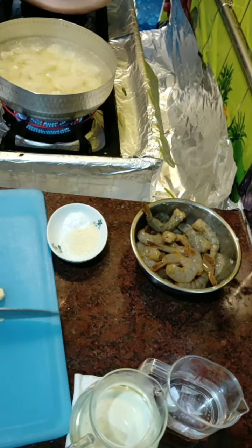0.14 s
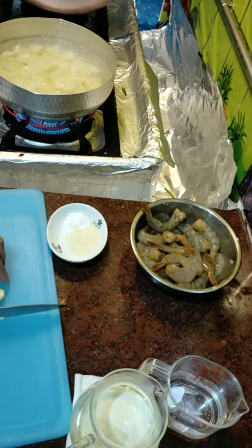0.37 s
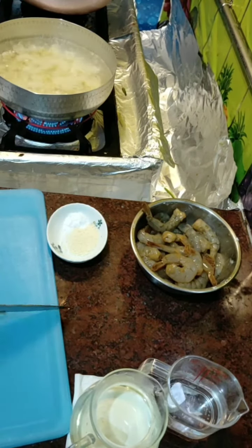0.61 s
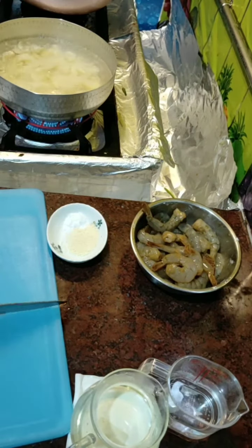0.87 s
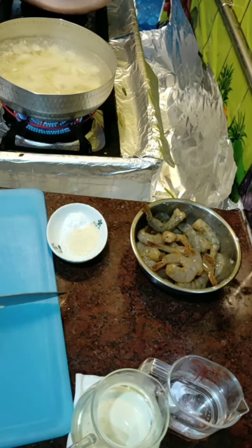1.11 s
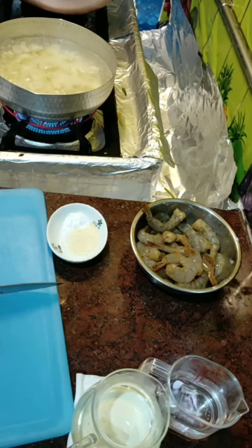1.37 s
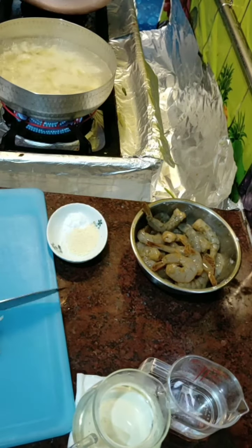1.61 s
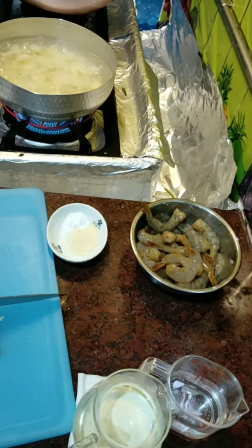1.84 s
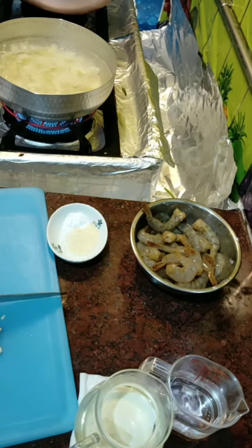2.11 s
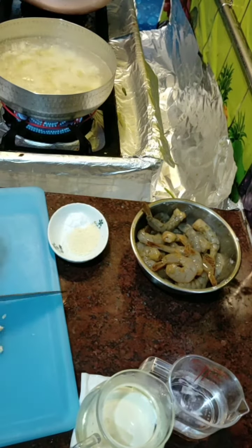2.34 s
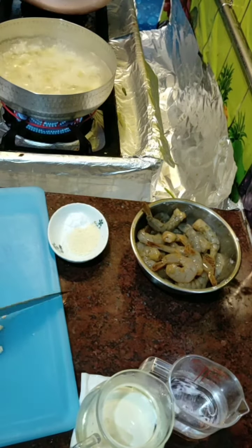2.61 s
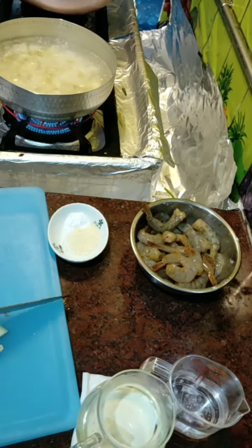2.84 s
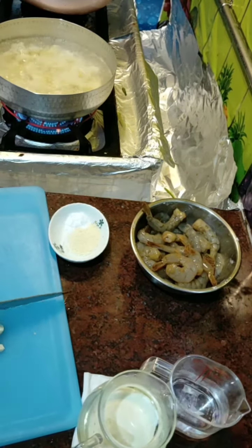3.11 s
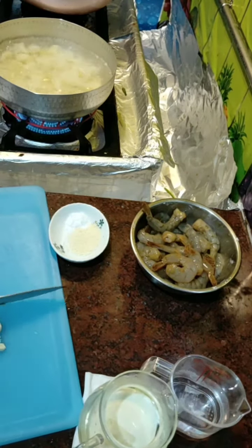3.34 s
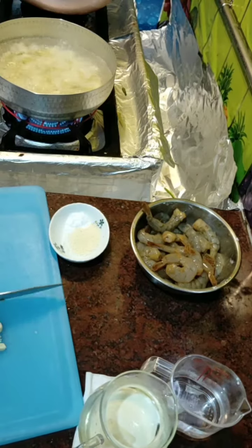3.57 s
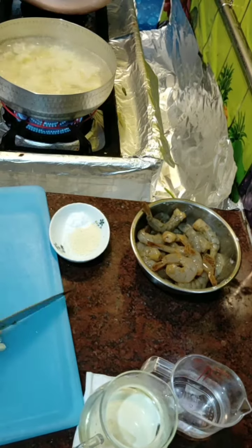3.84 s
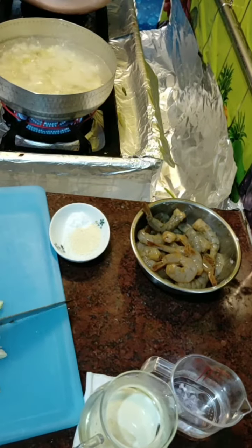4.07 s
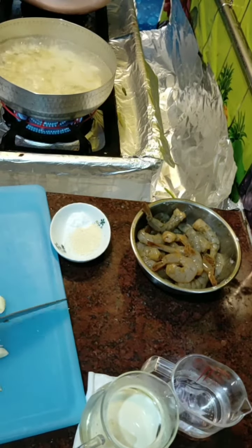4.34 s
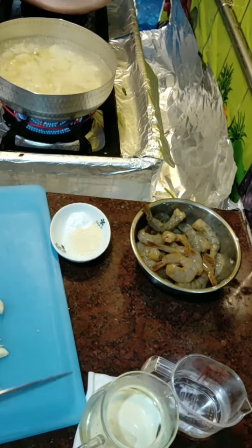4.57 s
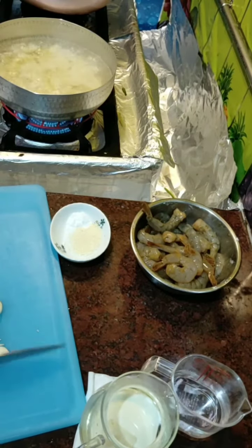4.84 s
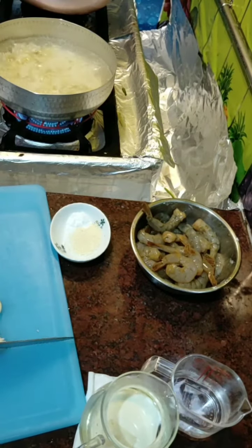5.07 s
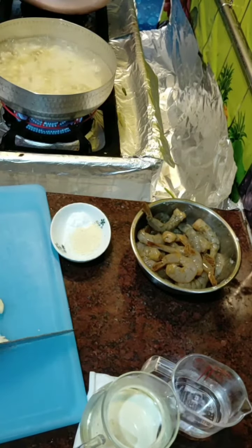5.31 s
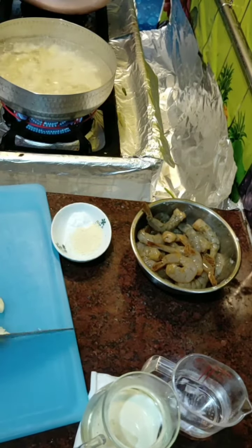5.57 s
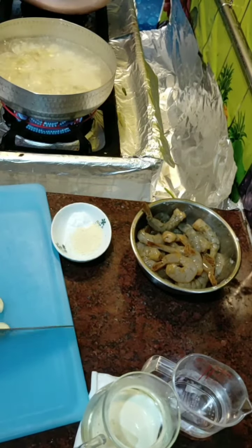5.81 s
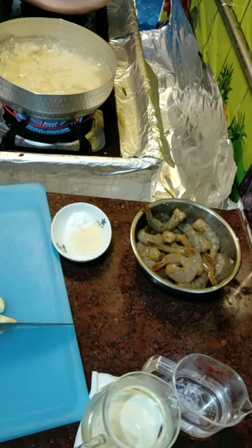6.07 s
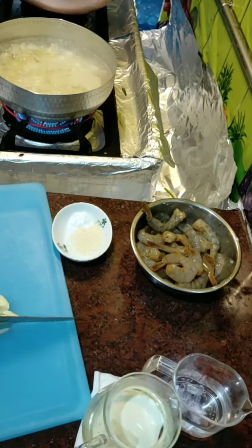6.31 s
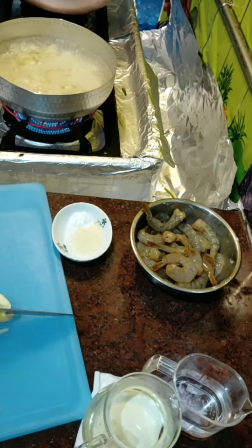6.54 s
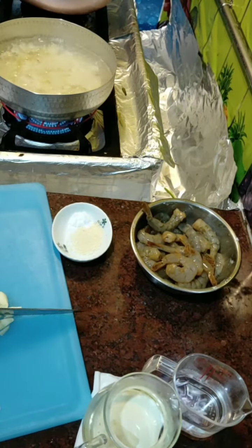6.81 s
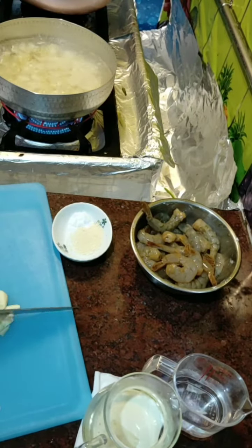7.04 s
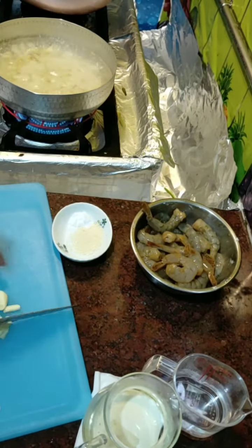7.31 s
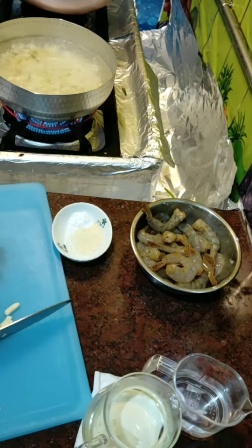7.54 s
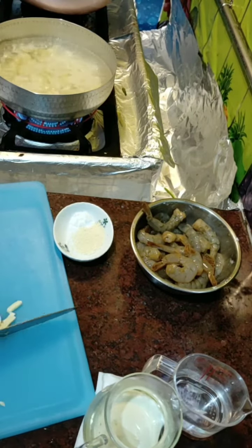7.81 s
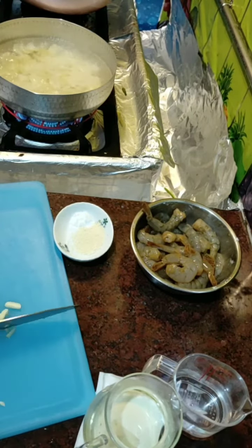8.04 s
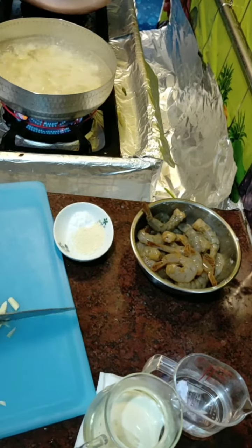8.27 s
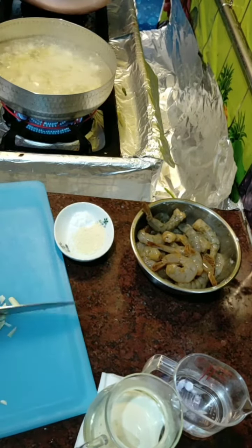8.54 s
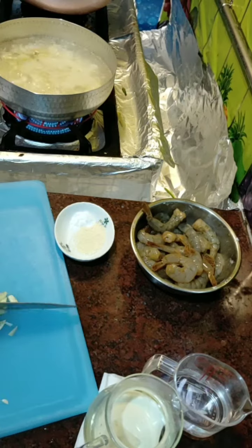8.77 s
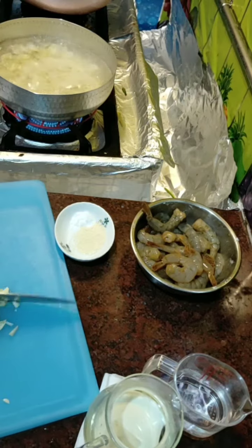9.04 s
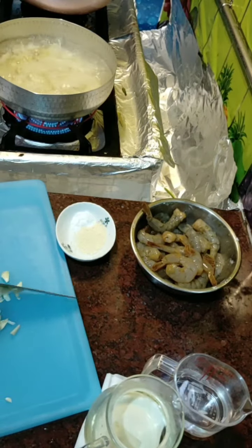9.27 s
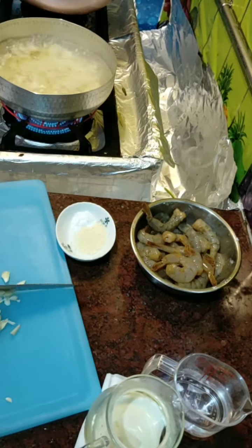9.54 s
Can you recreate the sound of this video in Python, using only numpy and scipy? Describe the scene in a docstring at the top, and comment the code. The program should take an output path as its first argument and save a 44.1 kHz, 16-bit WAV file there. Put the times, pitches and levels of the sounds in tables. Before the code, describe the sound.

Crisp garlic crunches and dry plastic-board knocks in a hard small kitchen, with brief blade rings, two short scrapes and soft bubbling far underneath.

```python
"""A crunch of garlic under a kitchen knife, then about four strokes a second on a plastic board in a hard kitchen.
Cells burst as random clicks, the edge's rub and blows excite damped board modes, and a counter thuds below.
Some blows set the steel blade or a dish ringing as dying sines; twice the edge sticks and slips sideways.
A simmering pot (bubbles as rising sines), shaped stove noise and wavering hum lie under it.
A phone's two microphones hear it, with sparse decaying echoes, a noise suppressor and soft overload."""
import sys
import numpy as np
from scipy import signal
from scipy.fft import rfft, irfft, next_fast_len
from scipy.io import wavfile
from scipy.ndimage import uniform_filter1d

SR = 44100
rng = np.random.default_rng(int(sys.argv[2]) if len(sys.argv) > 2 else 0)


def elevation(decibels):
    """Turn decibel levels (scalar or array-like) into linear amplitude ratios."""
    levels = np.asarray(decibels, float)
    return 10 ** (levels / 20)


def int16_out(signal):
    """Quantize to a 16-bit WAV file."""
    q = np.round(np.clip(np.atleast_2d(signal).T, -1, 1) * 32767)
    wavfile.write(sys.argv[1], SR, q.astype(np.int16))


N = 425565

# passes of the edge through the clove, or nudges of the slices: (bite [s], bearing down lasts [s],
# holding lasts [s], crunch level [dB], level of the rub passed into the board [dB])
CUT_PASSES = [(0.0, 0.0018, 0.0017, -48.5, -43.5), (0.14, 0.06, 0.011, -44.5, -40.5),
              (0.246, 0.039, 0.15, -61.5, -53), (0.57, 0.009, 0.021, -77.5, -69),
              (0.702, 0.018, 0.015, -77.5, -55.5), (0.729, 0.051, 0.013, -46, -41.5),
              (1.005, 0.048, 0.023, -40, -50.5), (1.294, 0.034, 0.019, -33, -23.5),
              (1.58, 0.0099, 0.0049, -26, -41), (1.869, 0.075, 0.011, -44, -38.5),
              (2.171, 0.048, 0.028, -38.5, -38.5), (2.401, 0.0095, 0.1, -66.5, -58.5),
              (2.471, 0.023, 0.017, -63.5, -59), (2.665, 0.037, 0.027, -54.5, -56.5),
              (2.819, 0.013, 0.011, -83, -55), (2.959, 0.018, .01, -75.5, -59.5),
              (3.004, 0.059, 0.0072, -45, -40.5), (3.282, 0.038, 0.017, -50.5, -46),
              (3.527, 0.043, 0.043, -46, -49.5), (3.764, 0.036, 0.014, -45, -64.5),
              (3.895, 0.03, 0.035, -51, -54.5), (4.102, 0.032, 0.057, -82, -60),
              (4.154, 0.0466, 0.033, -51, -40.5), (4.444, 0.02, 0.028, -87, -74),
              (4.715, 0.12, 0.095, -45, -42.5), (5.16, 0.038, 0.042, -48, -42.5),
              (5.399, 0.024, 0.06, -46.5, -49.5), (5.628, 0.016, 0.086, -46.5, -46.5),
              (5.883, 0.02, 0.019, -45, -47.5), (5.985, 0.023, 0.011, -85, -60),
              (6.124, 0.054, 0.0084, -47, -39), (6.377, 0.041, 0.0066, -53, -42.5),
              (6.526, 0.022, 0.15, -96, -63), (6.637, 0.024, 0.015, -41, -41),
              (6.776, 0.018, 0.015, -104, -60.5), (6.89, 0.044, 0.0135, -48, -40.5),
              (7.139, 0.049, 0.012, -51.5, -46), (7.359, 0.042, 0.082, -87, -61),
              (7.504, 0.047, 0.009, -55, -49.5), (7.731, 0.058, 0.0097, -56.5, -43),
              (8.015, 0.034, 0.04, -53, -47.5), (8.189, 0.016, 0.017, -93, -68.5),
              (8.274, 0.032, 0.049, -49.5, -44.5), (8.518, 0.043, 0.023, -45, -40.5),
              (8.778, 0.047, 0.039, -54.5, -47.5), (9.009, 0.052, 0.098, -49, -47),
              (9.331, 0.059, 0.026, -59, -50), (9.587, 0.06, .02, -50.5, -45)]
# landings of the edge: (time [s], blow level [dB], upper board modes [dB rel],
# lower board modes [dB rel], counter thud [dB rel])
EDGE_LANDINGS = [(0.165, -39.5, -6, -9, -20), (0.209, -26.5, 0, -3, -11), (0.483, -49, -4.5, -34, -20),
                 (0.758, -41.5, 1, -5, -43), (0.807, -25, -4.5, -4.5, -24.5), (1.028, -42, -8, -7, -34.5),
                 (1.049, -29.5, -7.5, -11.5, -57.5), (1.115, -38.5, -11.5, 2, -49),
                 (1.3203, -8, -0.5, -18.5, -60), (1.6038, -5, 0, -13, -21), (1.903, -39, -2.5, -37, -42),
                 (1.945, -37, -2, -13.5, -34), (1.955, -39, -3, 4, -42.5), (1.975, -38, -20, 3, -7.5),
                 (1.998, -48.5, -12, 4.5, -36), (2.201, -36, -3.5, -15, -47.5),
                 (2.213, -29.5, 2.5, -2.5, -43), (2.261, -37, -4, -1.5, -36.5),
                 (2.275, -31.5, -3, -12, -34), (2.285, -37.5, -1, -11, -39.5),
                 (2.699, -43, -1.5, -30, -10.5), (2.72, -41, -6, -22, -34), (2.805, -54, -2, -27.5, -37.5),
                 (2.905, -53, 1, -19.5, -15), (3.049, -41.5, -9.5, -25, -33), (3.077, -22, 0.5, -5.5, -5.5),
                 (3.088, -29.5, 0, -10, -32), (3.094, -35, -2, -8, -37), (3.101, -36, -11.5, -20, -34),
                 (3.318, -41, -14, -20.5, 6), (3.355, -25.5, -4.5, -4, -12), (3.378, -30.5, -3, -9, -30),
                 (3.557, -37, -5.5, -18, -7), (3.614, -35, -5, -5.5, -30.5), (3.937, -37.5, -9.5, -25, -29),
                 (3.98, -40, -10, -10, -38), (4.004, -38, -9, -6, -11), (4.107, -46.5, -7.5, -30, -39),
                 (4.197, -39.5, 2, -7.5, -21), (4.237, -30, -12, -5.5, -3),
                 (4.681, -18.5, -10.5, -10, -55.5), (4.692, -30.5, -10.5, -10, -57),
                 (4.797, -35.5, -20, -24, -45.5), (4.818, -28.5, -7, -29, -48), (4.84, -29, -17, -21, -48),
                 (4.874, -24, -20, -5.5, -43), (4.896, -21.5, -34, -7, -17), (4.921, -29.5, -10, -7.5, -17),
                 (5.181, -33, -16, -14, -58.5), (5.265, -34.5, -9, -2.5, -16), (5.428, -40, -19, -15, -42),
                 (5.438, -29, -10, -20, -42), (5.502, -31, -3.5, -10.5, -49), (5.657, -44, -9, -7, -28),
                 (5.682, -38.5, -9, -18, -4), (5.912, -39.5, -8.5, -23, -31), (5.938, -45, -5.5, 2, -42),
                 (6.079, -54.5, -38, -6.5, -5.5), (6.186, -40.5, -5.5, -4.5, -39),
                 (6.19, -27, -11.5, -6.5, -8.5), (6.206, -28.5, -12, -4, -32), (6.216, -25.5, 1, -21, -44),
                 (6.431, -35, -6.5, -0.5, -5.5), (6.447, -46, -27, 3, -40.5),
                 (6.622, -49.5, -23.5, -4, -39), (6.663, -33.5, -5.5, -28, -46),
                 (6.921, -43.5, -6.5, -18, -59), (6.956, -39.5, -6.5, 0, -29),
                 (7.177, -37.5, -10.5, -33, -8.5), (7.556, -36.5, -11, -30, -52),
                 (7.646, -46.5, -13, -55, -34), (7.787, -23, -9, -14, -30), (7.801, -30, -4.5, -3.5, -39),
                 (7.821, -30, 0.5, -5.5, -8), (8.042, -43.5, -3.5, -31.5, -41), (8.124, -39, -6, -2.5, -41),
                 (8.351, -41.5, -5, -0.5, -35.5), (8.377, -36.5, -4, -2.5, -38),
                 (8.562, -31, -6.5, 1.5, -11), (8.624, -27.5, 0, -9.5, -16),
                 (8.739, -44.5, -13, -27, -41.5), (8.792, -45, -3.5, -47, -41), (8.851, -37, 1.5, 2.5, -12),
                 (8.879, -33, -9, -25, -31), (9.046, -31, -4, -8.5, -42), (9.099, -33, -12, 0.5, -30),
                 (9.137, -21, -2.5, -17.5, -42.5), (9.282, -48, -21, -24, 1), (9.354, -43, -11, -32, -55),
                 (9.39, -39.5, -5, -10, -12.5), (9.631, -40.5, -1, -23, -35.5)]
# coherence of the two ports: (frequency [Hz], left-right likeness [-1 to 1])
PORT_LIKENESS = [(60, -1.2), (240, 1), (950, 0.14), (3770, 0.13), (15000, 0.35)]


def strokes():
    """Fracture noise: bursting cells are tiny random clicks; the rubbing edge excites the board's modes."""
    # spectrum of the bursts: (frequency [Hz], density [dB per Hz, relative])
    burst_spectrum = [(1650, -13), (2800, -5), (3430, -8.5), (4240, -14.5), (5020, -13.5), (8300, -7.5),
                      (12200, -19.5), (15100, -14.5), (16000, -39)]
    # release: (easing while held [dB/s], first fall [dB/s], lingering fall [dB/s], lingering part [dB])
    crunch_fade = (-110, -600, -150, -7.5)
    # release, same columns: ([dB/s], [dB/s], [dB/s], [dB])
    rub_fade = (-20, -400, -120, -14.5)
    crunch_db, rub_db = np.transpose(CUT_PASSES)[3:]
    crunch = signal.oaconvolve(grains(per_s=8000, spread_db=5.5), colour(burst_spectrum))[:N]
    rub = np.zeros(N)
    for spot in range(3):
        board = struck(upper_db=-5.5, lower_db=-8.5)
        rub += signal.oaconvolve(grains(per_s=600, spread_db=5.0), board)[:N]
    return pressure(crunch_db, crunch_fade) * crunch + pressure(rub_db, rub_fade) * evened(rub)


def pressure(peak_db, fade):
    """Force envelope: each cut bites, bears down, holds and lets go; overlapping cuts add in power."""
    bite_s, bite_db = 0.028, -11  # the edge bites quickly, this far under full strength, then bears down
    bite, bear, hold = np.transpose(CUT_PASSES)[:3, :, None]
    ease_db, fast_db, slow_db, linger_db = fade
    t = np.arange(0, N / SR, .002)
    since = t - bite
    climb = np.clip(since / bite_s, 0, 1) ** 3.4 * elevation(bite_db * np.clip(1 - since / bear, 0, 1))
    held = elevation(ease_db * np.clip(since - bear, 0, hold))
    after = np.maximum(since - bear - hold, 0)
    fall = (elevation(fast_db * after) + elevation(linger_db + slow_db * after)) / (1 + elevation(linger_db))
    envelope = np.linalg.norm(elevation(peak_db)[:, None] * climb * held * fall, axis=0)
    return np.interp(np.arange(N) / SR, t, envelope)


def knocks():
    """Impact: brief contact forces excite a crack, the board's modes and a slower thud of the counter."""
    # first instant of a blow: (frequency [Hz], density [dB per Hz, relative])
    crack_spectrum = [(120, -79), (200, -100), (722, -3), (1080, -27.5), (1320, -25), (1480, 13.5),
                      (1980, 11), (2700, 11.5), (3760, 16), (7830, -3), (11000, -27.5), (16000, -29.5)]
    # counter modes: (frequency [Hz], level [dB rel], T60 [s])
    counter_modes = [(117, 0, 0.2), (100, -3, 0.24), (148, -2, 0.15), (200, -5, .08), (60, -6, 0.15)]
    t, out, crack = np.arange(9000) / SR, np.zeros(N), colour(crack_spectrum)
    for s, db, upper_db, lower_db, thud_db in EDGE_LANDINGS:
        # weak blows are cushioned by the clove and land in several touches
        decay_s = 0.0012 * elevation(-.4 * (db + 13.0))
        touches = rng.standard_normal(1500) ** 3 * np.exp(-t[:1500] / decay_s)
        touches[10] += 24  # the first contact
        touches /= np.linalg.norm(touches)
        board = signal.fftconvolve(touches, struck(upper_db, lower_db))
        add(out, s, elevation(db - 6.5) * board)
        crack_db = 0.96 * db + 8.0 + 0.5 * upper_db
        add(out, s, elevation(crack_db) * signal.fftconvolve(touches, crack))
        swell = (1 - np.exp(-t / .025)) ** 2
        thud = ringing(counter_modes, t, spread_db=2, detune=.02) * swell
        add(out, s, elevation(db + thud_db - 3) * thud)
    return out


def struck(upper_db, lower_db):
    """Modal response of the board as one spot excites it; a thin board radiates little bass."""
    # board modes: (frequency [Hz], level before the tilt [dB rel], T60 [s])
    board_modes = [(383.3, 1, 0.013), (590, 1.5, 0.025), (750, -2, 0.022), (889, -5, 0.022),
                   (1040, -7, 0.044), (1150, -6, 0.028), (1370, -4.5, 0.025), (1430, -6, 0.025),
                   (1560, -5, 0.025), (1670, -2.5, 0.013), (1910, 0, 0.02), (2126, 4, 0.013),
                   (2479, 8, 0.0097), (2827, 1.5, 0.012), (3250, -2.5, 0.0099)]
    t = np.arange(3000) / SR
    # (frequency [Hz], level [dB rel])
    tilt = [(60, lower_db - 48.0), (150, lower_db - 20.0), (420, lower_db), (620, lower_db),
            (850, 0.0088), (1650, 0.0079), (1950, upper_db), (3200, upper_db), (3900, upper_db - 10.5)]
    rise = 1 - np.exp(-t / .0005)  # the bending wave needs a moment to spread
    return signal.fftconvolve(rise * ringing(board_modes, t, spread_db=1.5), colour(tilt))


def clacks():
    """Local resonance: blows start with a few bright cycles under the edge, stronger for hard blows."""
    clack_hz, clack_s, clack_db = 2520, .0016, 20
    growth = .5  # extra dB per dB of blow
    t, out = np.arange(600) / SR, np.zeros(N)
    for (s, db, upper_db, *_), luck in zip(EDGE_LANDINGS, rng.standard_normal(len(EDGE_LANDINGS))):
        envelope = (t / clack_s) ** 2 * np.exp(-2 * t / clack_s)
        cycles = envelope * np.sin(2 * np.pi * clack_hz * (1 + 0.057 * luck) * t)
        add(out, s, elevation((0.5 + growth) * db + upper_db + clack_db) * cycles)
    return out


def blade():
    """Lightly damped modes: steel and china outring plastic; contact with the board chokes the steel."""
    # strikes of the blade: (time [s], high ring [dB], low ring [dB], middle ring [dB])
    blade_strikes = [(2.2749, -46, -42, -41), (3.1015, -45, -40, -36.5), (3.3783, -44.5, -42.5, -40.5),
                     (3.617, -65, -63, -49.5), (4.003, -64.5, -65, -63), (4.2356, -53.5, -46, -46.5),
                     (5.2651, -56.5, -56, -56), (5.502, -56, -52.5, -48), (6.215, -40.5, -42.5, -30),
                     (7.8218, -40.5, -41.5, -38), (8.623, -42.5, -42, -43), (8.8767, -51.5, -48, -43.5),
                     (9.139, -31, -31.5, -24)]
    # free blade: (frequency [Hz], level [dB rel], T60 before choking [s])
    blade_modes = [(3484, 12, 0.05), (3553, 11, 0.3), (3825, 10, 0.07), (3804, 1, 0.2), (4900, 8, .007),
                   (5700, 5, .007), (7205, 0, 0.25), (7240, 8, 0.2), (6630, -7, 0.076)]
    # borders between low, middle and high blade modes: (frequency [Hz])
    family_edges = (3700, 5000)
    # final choking of each family: (low [dB], middle [dB], high [dB])
    choke_db = (-17, -17, -9)
    # dish shaken by a blow: (time [s], level [dB])
    dish_blows = [(1.8, -56), (2.2754, -61), (6.44, -57), (8.124, -67)]
    # dish modes: (frequency [Hz], level [dB rel], T60 [s])
    dish_modes = [(2152, 5, 0.7)]
    choke_s, rattle_depth_db, rattle_s = .028, 3, .005
    t, out = np.arange(20000) / SR, np.zeros(N)
    family = np.searchsorted(family_edges, np.transpose(blade_modes)[0])
    # the edge settles on the board
    choke = elevation(np.outer(choke_db, 1 - np.exp(-(t / choke_s) ** 2))) * (1 - np.exp(-t / 0.00049))
    for s, high_db, low_db, mid_db in blade_strikes:
        rattle_db = rattle_depth_db * flutter(count=3, size=len(t), seconds=rattle_s)
        for k, db in enumerate((low_db, mid_db, high_db)):
            ring = ringing(np.array(blade_modes)[family == k], t, detune=0.00052)
            add(out, s, elevation(db + rattle_db[k]) * choke[k] * ring)
    for s, db in dish_blows:
        add(out, s, elevation(db) * ringing(dish_modes, t, detune=.0002) * (1 - np.exp(-t / .004)))
    return out


def scrapes():
    """Stick-slip friction: each slip is a gritty puff into the board and the damped blade's fickle modes."""
    # sideways drags: (start [s], end [s], slip rate [per s], unevenness [0-1],
    # board level [dB], blade level [dB], blade pitch [factor])
    drags = [(3.756, 3.855, 203, .06, -41, -45.5, .97), (4.774, 4.954, 55, .4, -41.5, -40, 1.0)]
    # blade under drag: (frequency before the pitch factor [Hz], width [Hz], level [dB rel],
    # change from start to end as the edge tilts [dB])
    drag_modes = [(1270, 70, 0, -14), (3330, 60, -6, -24), (5500, 320, 0, -18), (6400, 140, 1, -6),
                  (7390, 80, -5, 18), (7740, 70, -5, 6), (8250, 120, -6, -16), (9860, 200, -7, 2),
                  (11600, 300, -7, -6), (13500, 300, -8, -6), (14900, 110, -3, -20)]
    flutter_db, flutter_s = 4.5, .012  # each mode swells and drops out on its own
    out, t = np.zeros(N), np.arange(3000) / SR
    for start, end, per_s, uneven, board_db, steel_db, pitch in drags:
        n = round((end - start) * SR)
        drift = evened(uniform_filter1d(rng.standard_normal(n), 200))
        turns = np.cumsum(per_s * np.exp(uneven * drift)) / SR
        slip_gain = elevation(1.7 * uneven * rng.standard_normal(int(turns[-1]) + 1))
        size = slip_gain[turns.astype(int)] * np.hanning(n) ** 0.91
        phase = turns % 1
        puff = np.exp(-phase / 0.033)
        grit = .3 * rng.standard_normal(n) ** 3 * (.4 + puff + np.exp(-phase / .3))
        slips = size * (evened(np.diff(puff, prepend=1)) + grit)
        board = signal.fftconvolve(slips, struck(upper_db=-2.0, lower_db=-3.0))
        add(out, start, elevation(board_db) * evened(board))
        grip_db = flutter_db * flutter(count=len(drag_modes), size=n, seconds=flutter_s)
        steel = 0
        for (hz, width, db, change_db), grip in zip(drag_modes, grip_db):
            force = slips * elevation(db + change_db * np.linspace(-.5, .5, n) + grip)
            mode = np.exp(-np.pi * width * t) * np.sin(2 * np.pi * pitch * hz * t)
            steel = steel + signal.fftconvolve(force, mode)
        add(out, start, elevation(steel_db) * evened(steel))
    return out


def pot():
    """Bubble resonance: random low bubbles, each a few cycles that rise in pitch."""
    # simmering: (time [s], level [dB])
    simmer = [(0.0, -76), (1.53, -71), (1.879, -82.5), (2.36, -64.5), (2.55, -78), (4.0, -79), (4.49, -78),
              (4.7, -72.5), (4.86, -83), (4.97, -75), (6.04, -85.5), (6.42, -66.5), (7.26, -80),
              (7.77, -72), (8.01, -78), (8.52, -64.5), (8.65, -70.5), (9.65, -69.5)]
    t, out = np.arange(3000) / SR, np.zeros(N)
    for hz in np.geomspace(190, 440, 6):
        bubble = np.sin(2 * np.pi * hz * t * (1 + 7.2 * t)) * (t / .012) * np.exp(-t / 0.0077)
        out += signal.oaconvolve(grains(per_s=4.1, spread_db=2.5), bubble)[:N]
    return elevation(np.interp(np.arange(N) / SR, *np.transpose(simmer))) * evened(out)


def glugs():
    """Large-bubble resonance: a few are heard singly, as short soft tones that hold or rise in pitch."""
    # (time [s], length [s], starting pitch [Hz], pitch gained by the end [0-1], level [dB])
    large_bubbles = [(0.603, 0.085, 386.5, 0.06, -61.5), (2.428, 0.046, 375, 0.05, -55.5),
                     (2.515, .07, 537, 0.1, -58), (4.01, 0.088, 164.6, 0.1, -58),
                     (4.48, 0.045, 292, 0, -63), (4.491, 0.079, 748, 0.02, -67),
                     (7.378, 0.103, 381, 0, -66.5), (7.68, 0.21, 363, 0.12, -61),
                     (8.204, 0.12, 365, 0.07, -57.5), (9.521, 0.089, 269, 0.94, -58.5)]
    out = np.zeros(N)
    for s, length, hz, gained, db in large_bubbles:
        u = np.arange(round(length * SR)) / (length * SR)
        tone = np.sin(2 * np.pi * np.cumsum(hz * (1 + gained * u)) / SR)
        add(out, s, elevation(db) * np.sin(np.pi * u ** 0.4) * tone)
    return out


def stove():
    """Partly coherent noise: faint hiss and hum that come and go in patches of time and frequency."""
    # (frequency [Hz], density [dB per Hz, relative])
    stove_spectrum = [(15, -10), (45, -37.5), (117, 0), (185, -30.5), (384, -10.5), (476, -17.5),
                      (1020, -4), (1260, -14.5), (2610, -15.5), (4030, -29.5), (7110, -30.5), (10700, -44),
                      (16000, -38)]
    frames, hz = N // 256 + 5, np.fft.rfftfreq(1024, 1 / SR)
    a, b, c, d, patches = rng.standard_normal((frames, 513, 5)).T
    patches = evened(uniform_filter1d(uniform_filter1d(patches, 8, 0), 20, 1))
    same = np.clip(read(PORT_LIKENESS, hz), -1, 1)[:, None]
    left, other = a + 1j * b, c + 1j * d
    z = np.array([left, same * left + np.sqrt(1 - same ** 2) * other])
    z *= elevation(read(stove_spectrum, hz)[:, None] + 1.3 * patches)
    noise = signal.istft(z, nperseg=1024, noverlap=768)[1][:, :N]
    return elevation(-63.5) * evened(noise)


def hum():
    """Slow amplitude and frequency modulation: two low tones waver in level and pitch."""
    # (mean frequency [Hz], rms level before wavering [dB])
    hum_tones = [(59.2, -82), (118.4, -80.5)]
    waver = signal.resample(rng.standard_normal((len(hum_tones), 90)), N, axis=1)
    hz, db = np.transpose(hum_tones)[:, :, None]
    phase = 2 * np.pi * np.cumsum(hz * (1 + 0.023 * waver[::-1]), 1) / SR
    return (np.sqrt(2) * elevation(db + 4.0 * waver) * np.sin(phase)).sum(0)


def kitchen(x, t60_share, wet_db):
    """Direct and reverberant sound: the knife wanders, so the echo pattern drifts between two."""
    right_lag_s = .000125  # the right port is farther from the board
    turn = 2 * np.pi * .9 * np.arange(N) / SR
    size = next_fast_len(N)
    delay = np.exp(-2j * np.pi * np.fft.rfftfreq(size, 1 / SR) * right_lag_s)
    late = irfft(rfft(x, size) * delay, size)[:N]
    wet = np.zeros((2, N))
    for weight in (np.cos(turn), np.sin(turn)):
        wet += signal.oaconvolve((x * weight)[None], echoes(t60_share), axes=1)[:, :N]
    return (np.array([x, late]) + elevation(wet_db) * wet) / np.hypot(1, elevation(wet_db))


def echoes(t60_share):
    """Frequency-dependent reverberation: sparse echoes die band by band."""
    # (frequency [Hz], T60 before scaling by t60_share [s])
    room_decay = [(100, 0.57), (260, 0.33), (700, 0.28), (1600, 0.23), (2700, 0.17), (4850, 0.25),
                  (9000, 0.19), (14000, 0.14)]
    taps = np.zeros((2, SR // 2))
    slots = np.arange(240, SR // 2 - 20, 20)
    places = slots + rng.integers(0, 20, (2, len(slots)))
    np.put_along_axis(taps, places, rng.choice([-1., 1.], (2, len(slots))), 1)
    hz, t, z = signal.stft(taps, SR, nperseg=256)
    decay = elevation(-60 * t / (t60_share * read(room_decay, hz)[:, None]))
    tail = signal.istft(z * decay, SR, nperseg=256)[1]
    # long waves reach both ports alike
    same = np.clip(read(PORT_LIKENESS, np.fft.rfftfreq(tail.shape[1], 1 / SR)), 0, 1)
    left, other = rfft(tail)
    tail = irfft([left, same * left + np.sqrt(1 - same ** 2) * other], tail.shape[1])
    return tail / np.linalg.norm(tail[0])


def ringing(modes, t, spread_db=0., detune=0.002):
    """Modal superposition: dying sines, excited a little differently at each strike point."""
    hz, db, t60 = np.transpose(modes)[:, :, None]
    level_luck, pitch_luck, phase_luck = rng.standard_normal((3, len(modes), 1))
    decay = elevation(db + spread_db * level_luck - 60 * t / t60)
    return (decay * np.sin(2 * np.pi * (hz * (1 + detune * pitch_luck) * t + phase_luck))).sum(0)


def grains(per_s, spread_db):
    """Shot noise: random clicks of either sign, a few of them large, at rms 1."""
    size = elevation(spread_db * np.minimum(rng.exponential(1, N), 5)) * rng.choice([-1., 1.], N)
    return evened(size * (rng.random(N) < per_s / SR))


def colour(points):
    """Minimum-phase filter: a causal response of energy 1 with the given spectrum."""
    hz = abs(np.fft.fftfreq(4096, 1 / SR))
    log_gain = np.log(elevation(np.maximum(read(points, hz), -100)))
    taps = np.fft.ifft(np.exp(np.conj(signal.hilbert(log_gain)))).real[:1024]
    return taps / np.linalg.norm(taps)


def flutter(count, size, seconds):
    """Low-pass noise: slow random curves, one a row, of joint rms 1."""
    width = round(seconds * SR)
    noise = rng.standard_normal((count, size))
    return evened(uniform_filter1d(uniform_filter1d(noise, width, 1), width, 1))


def evened(x):
    """Power normalisation to rms 1."""
    return x / np.sqrt(np.mean(x ** 2) + 1e-20)


def read(points, hz):
    """Interpolation of a spectrum on a log-frequency axis."""
    f, value = np.transpose(points)
    return np.interp(np.log(hz + 1), np.log(f + 1), value)


def add(mix, s, sound):
    """Linear superposition: mixes a sound in at time s."""
    part = mix[round(s * SR):][:len(sound)]
    part += sound[:len(part)]


def suppress(x):
    """Spectral gating: bands near their own quiet level are turned down and open for louder sound."""
    hz, _, z = signal.stft(x, SR, nperseg=1024, noverlap=768)
    power = uniform_filter1d(uniform_filter1d((abs(z) ** 2).mean(0), 10, 0), 4, 1)
    power_db = 10 * np.log10(abs(power) + 1e-20)
    over_db = power_db - np.percentile(power_db, 15, axis=1)[:, None]
    cut_db = np.clip(2.1 * (over_db - 1.5), -17, 0) * (hz > 160)[:, None]  # the bass is left alone
    return signal.istft(z * elevation(cut_db), nperseg=1024, noverlap=768)[1][:, :N]


def scene():
    """Superposition: blows and cutting fill the room; clack, ringing and pot come mostly direct."""
    blows = kitchen(knocks() + scrapes(), t60_share=1.05, wet_db=-2.0)
    cutting = kitchen(strokes(), t60_share=0.5, wet_db=1.0)
    near = kitchen(clacks() + blade() + pot() + glugs(), t60_share=0.99, wet_db=-10.0)
    return blows + cutting + near + stove() + hum()


def low_pass(x):
    """Removes everything above the highest recorded frequency."""
    return signal.sosfilt(signal.butter(12, 16800, fs=SR, output="sos"), x)


def record(dry):
    """Unequal port sensitivity and band limits, then the suppressor and saturation of the input."""
    # (frequency [Hz], left over right [dB])
    port_balance = [(60, 8), (180, 3), (550, 4), (1650, 2), (4970, 5.5), (15000, 8)]
    edge_hz, limit = 15900, 1.05  # top of the band; level where the input saturates
    size = next_fast_len(N)
    hz = np.fft.rfftfreq(size, 1 / SR)
    lean = elevation(read(port_balance, hz) / 2)
    band = (hz < edge_hz) * hz ** 2 / (hz ** 2 + 45 ** 2)
    ports = irfft(rfft(dry, size) * [lean, 1 / lean] * band, size)[:, :N]
    mix = limit * np.tanh(suppress(ports) / limit)
    return low_pass(mix)


dry = scene()
out = record(dry)
int16_out(out)
```